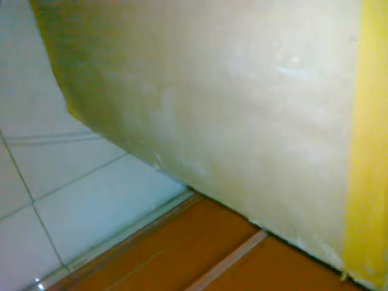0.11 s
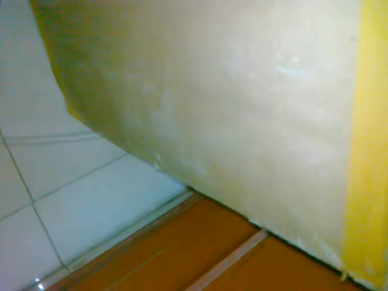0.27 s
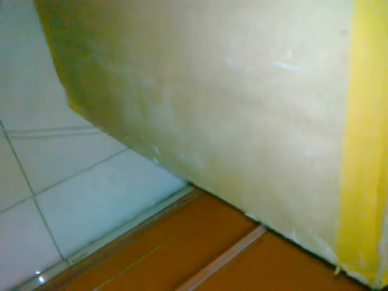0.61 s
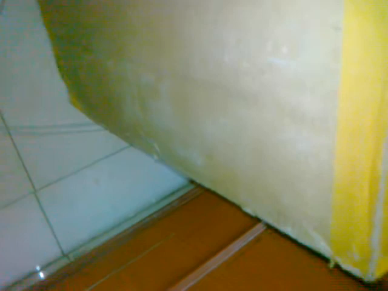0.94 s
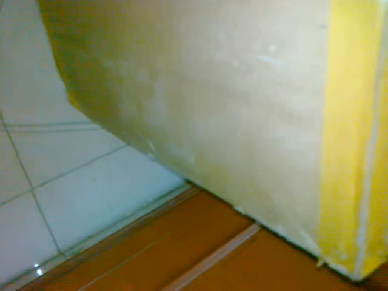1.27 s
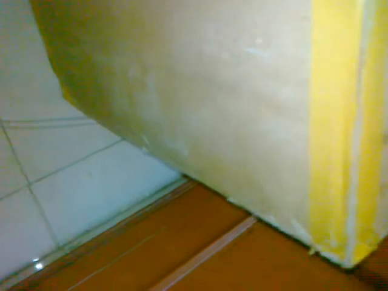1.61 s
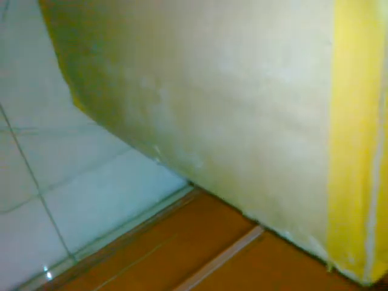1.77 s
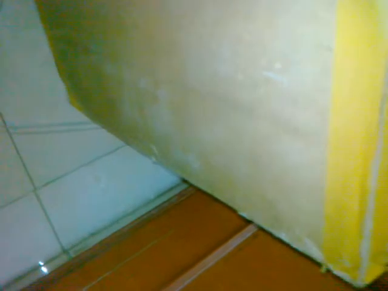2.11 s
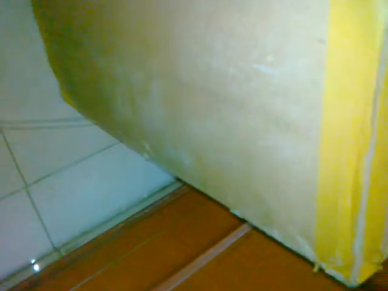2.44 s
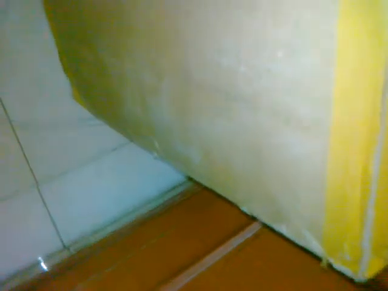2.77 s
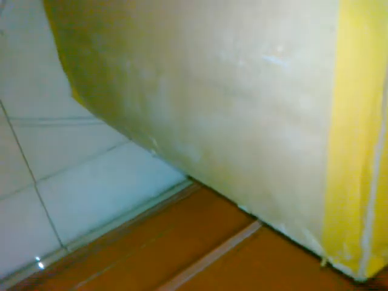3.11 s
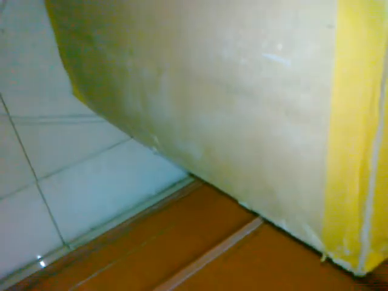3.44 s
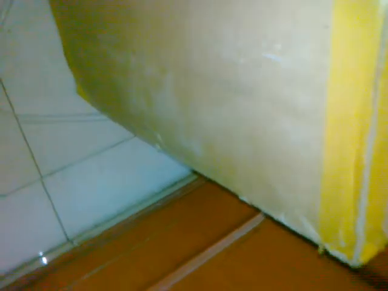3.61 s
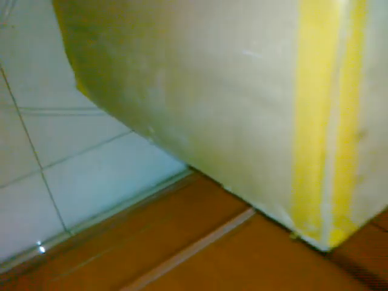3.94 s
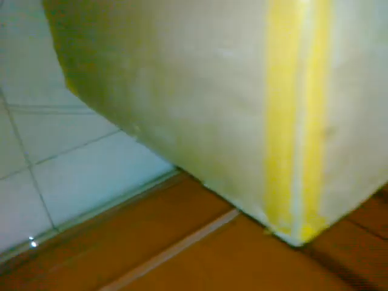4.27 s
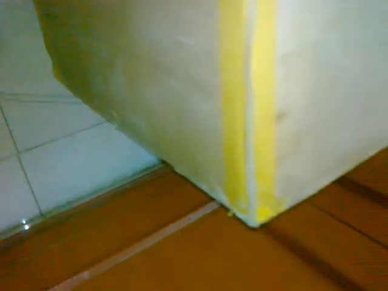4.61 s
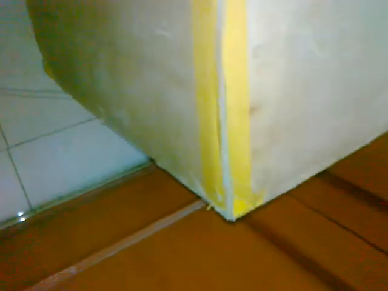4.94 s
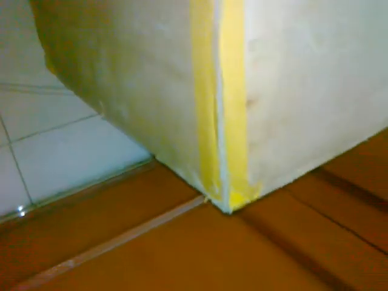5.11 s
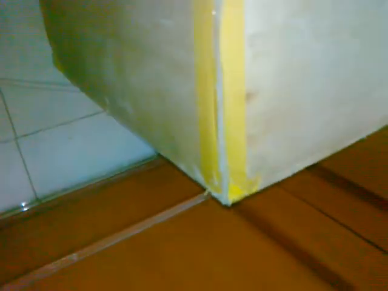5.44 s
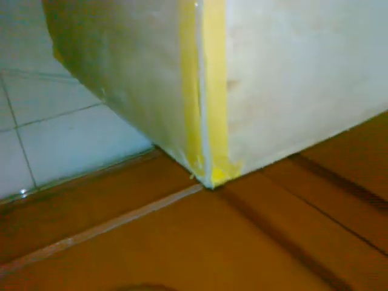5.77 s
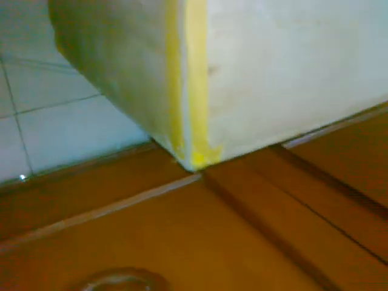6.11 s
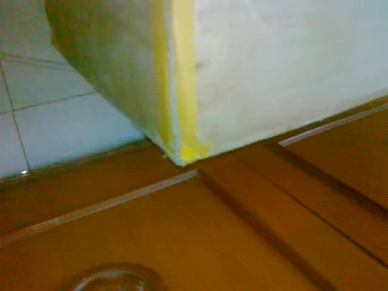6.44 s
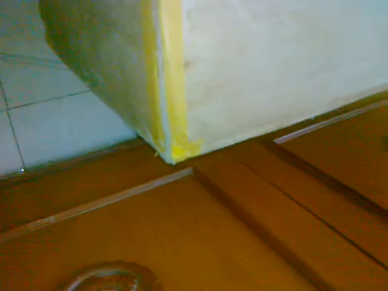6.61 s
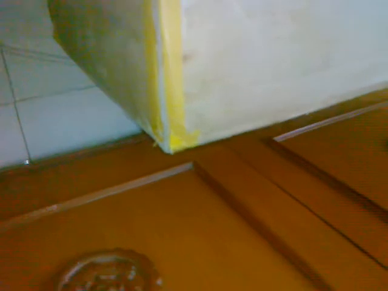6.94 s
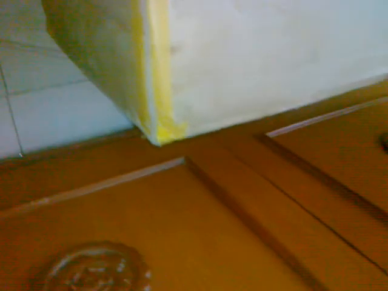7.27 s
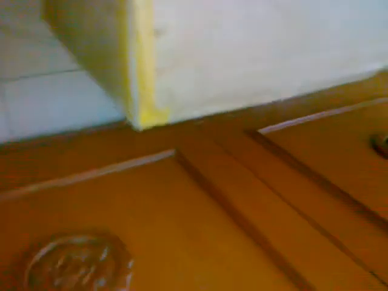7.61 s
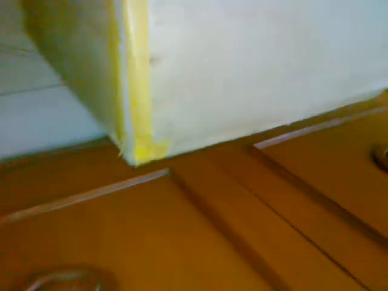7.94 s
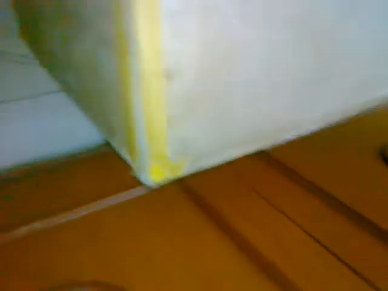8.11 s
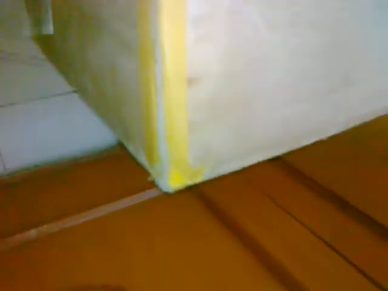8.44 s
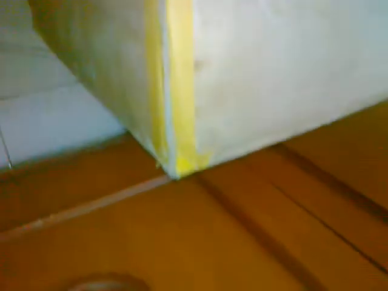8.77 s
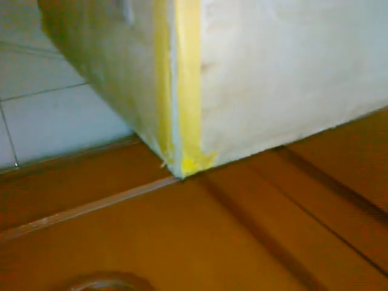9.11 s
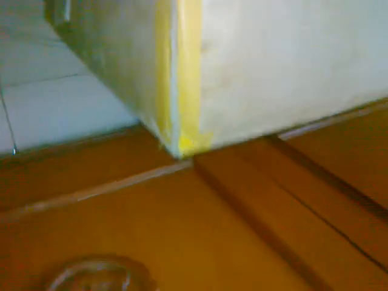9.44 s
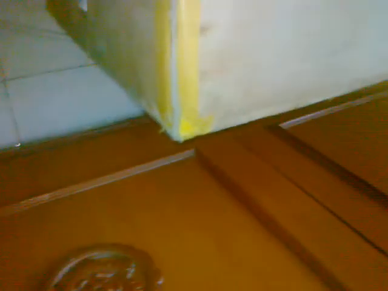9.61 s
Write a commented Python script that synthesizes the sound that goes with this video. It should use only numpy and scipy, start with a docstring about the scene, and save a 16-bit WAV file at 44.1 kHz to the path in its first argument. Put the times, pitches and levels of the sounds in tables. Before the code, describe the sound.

A big cardboard box rubs and scrapes against a wooden door, with hollow knocks and tape ticks over a faint hum.

```python
"""A small tiled room, where a big taped cardboard box is turned and slid against a wooden door.
Its edges rub and catch in tiny slips that drum the hollow walls, rasp in the board and hiss on the tape.
The box knocks and is set down, booming and slapping, and the tape ticks.
Under it lie a mains hum, a low room murmur and the narrow whine of a cheap microphone."""
import sys
import numpy as np
from scipy import signal
from scipy.fft import rfft, irfft, next_fast_len
from scipy.io import wavfile
from scipy.ndimage import map_coordinates

SR = 44100
rng = np.random.default_rng(int(sys.argv[2]) if len(sys.argv) > 2 else 0)


def master_out(mix):
    """Clip the mix to full scale and print it as 16-bit PCM to the path in sys.argv[1]."""
    frames = np.transpose(np.atleast_2d(mix))
    ceiling = np.clip(frames, -1, 1)
    pcm = np.round(ceiling * 32767).astype(np.int16)
    wavfile.write(sys.argv[1], SR, pcm)


N = 429093


# Pushes on the box. Each row: start, crest and end in seconds, drum level in dB, base drum centre in Hz.
PUSHES = [(1.27, 1.33, 1.46, -49, 164), (1.546, 1.638, 1.64, -45, 152), (3.388, 3.453, 3.5, -48.5, 150),
          (3.59, 3.785, 4.04, -43.5, 184), (4.05, 4.327, 4.84, -37.5, 180),
          (5.195, 5.694, 5.73, -36.5, 158), (5.79, 5.86, 5.96, -35.5, 125), (6.03, 6.23, 6.53, -43.5, 129),
          (6.67, 6.7, 7.2, -52, 150), (6.9, 7.1, 7.2, -60, 149), (7.906, 8.077, 8.15, -49.5, 226),
          (8.748, 8.915, 8.83, -43, 154), (9.006, 9.03, 9.4, -54, 170), (9.37, 9.389, 9.46, -48, 153)]
# Edges breaking free. Each row: start and length in seconds, rub and hiss in dB, rub's upper edge in Hz.
SCRAPES = [(0.29, 0.036, -66.5, -74, 1900), (1.237, 0.036, -57, -67, 1460), (1.305, .03, -60, -69, 1470),
           (1.39, .05, -57, -72, 1460), (1.477, 0.027, -60.5, -74, 1800),
           (1.567, 0.071, -54.5, -58.5, 1700), (3.389, 0.083, -46, -68, 1110), (3.63, 0.11, -47, -72, 1050),
           (3.791, .18, -47, -63, 1750), (4.063, .02, -55.5, -70, 1500), (4.11, .06, -51.5, -63.5, 1300),
           (4.277, 0.079, -56, -69, 1600), (4.402, 0.078, -47.5, -55, 2020),
           (4.485, 0.13, -49.5, -82, 1400), (5.176, 0.072, -53.5, -71, 1220),
           (5.28, 0.089, -50.5, -75, 1310), (5.49, 0.033, -48.5, -66, 1580),
           (5.547, 0.09, -44.5, -78, 1720), (5.66, 0.053, -40, -68, 1150), (5.757, 0.26, -47, -70, 730),
           (6.04, 0.14, -59, -67, 1500), (6.196, .05, -46, -61, 1270), (6.372, 0.043, -49.5, -59, 1800),
           (6.506, 0.032, -55.5, -79, 1450), (6.668, 0.12, -48.5, -62.5, 1530),
           (6.9, .06, -50, -59.5, 1760), (7.056, .04, -49, -61, 2000), (7.146, 0.046, -47.5, -58, 2200),
           (7.97, 0.036, -50, -69, 1720), (8.027, 0.069, -45, -68, 2030), (8.121, 0.033, -35.5, -47, 3300),
           (8.185, 0.17, -48.5, -57, 2410), (8.819, 0.11, -47, -57, 1533), (9.02, .05, -57.5, -58.5, 1400),
           (9.224, 0.019, -55, -70, 1830), (9.57, 0.21, -59.5, -64, 1830)]
def sliding():
    """Pushes drum the box and make it creep; scrapes rub and hiss. The strongest contact sets the pitch."""
    drum_power, centre_sum = 0, 0
    for start, crest, end, db, centre_hz in PUSHES:
        power = amp(db + hump_db(start, crest, end, attack=258, swell=20, sag=13.5, release=191)) ** 2
        drum_power += power
        centre_sum += power * centre_hz
    creep_rub_db, creep_hiss_db, creep_hz = -15, -30.5, 860
    rub_power = drum_power * amp(creep_rub_db) ** 2
    hiss_power = drum_power * amp(creep_hiss_db) ** 2
    edge_sum = rub_power * creep_hz
    for start, length, rub_db, hiss_db, upper_hz in SCRAPES:
        power = amp(hump_db(start, start, start + length, attack=450, swell=0, sag=61, release=222)) ** 2
        rub_power += power * amp(rub_db) ** 2
        hiss_power += power * amp(hiss_db) ** 2
        edge_sum += power * amp(rub_db) ** 2 * upper_hz
    edge_hz = edge_sum / rub_power
    drum_hz = centre_sum / drum_power * (edge_hz / 1330) ** 0.46  # faster slides shake higher modes
    grip_db = 1.87 * wobble(40)  # the edge catches and lets go
    drum = wall_drumming(drum_hz) * np.sqrt(drum_power) * amp(0.68 * grip_db)
    rub = edge_rub(edge_hz) * np.sqrt(rub_power) * amp(grip_db)
    hiss = tape_hiss() * np.sqrt(hiss_power) * amp(grip_db)
    return drum + rub + hiss


# Modes of the hollow walls. Each row: frequency in Hz, relative level in dB, free t60 in seconds.
WALL_MODES = [(57.5, -7.5, 0.55), (79, -14.5, 0.074), (115.2, -2.5, 0.69), (150.9, -3, 0.24),
              (162, 1.5, 0.14), (195.5, 3, 0.094), (237, -1.5, 0.12), (276, 0, 0.11), (332, -17.5, 0.47),
              (377.4, -4.5, 0.19), (466.3, -2.5, 0.14), (523.6, -8.5, 0.25)]
def wall_drumming(centre_hz):
    """Slips drum the hollow walls, which the hands damp."""
    t = np.arange(SR // 2) / SR
    held_walls = ring(WALL_MODES, t) * amp(-60 * t / 0.73)
    drum = signal.fftconvolve(slips(per_s=2000), held_walls)[:N]
    return swept(drum, centre_hz, below=2.45, above=1.72, frame=2048)


# Modes of the stiff board at a contact. Each row: frequency in Hz, relative level in dB, t60 in seconds.
BOARD_MODES = [(412, -16, 0.048), (614, -3, 0.029), (744, 2, 0.03), (859, 4, 0.018), (977.5, 1.5, 0.034),
               (1061, 1.5, 0.027), (1213, 5.5, 0.0084), (1446, -9, 0.045), (1561, -8.5, 0.068),
               (1734, -2.5, 0.024), (2260, 0.5, 0.0079), (3080, -5.5, 0.013)]
# Friction spectrum. Each row: frequency in Hz, relative level in dB.
RUB_SPECTRUM = [(150, -25), (300, 3), (550, 8.5), (750, 2), (980, -4), (1300, -1.5), (1600, -0.5),
                (2100, -4), (3000, -4), (4500, -9.5), (9000, -28)]
def edge_rub(edge_hz):
    """Slips rasp in the board; a fast slide skims, loses its lows and squeals."""
    t = np.arange(SR // 2) / SR
    jerks = slips(per_s=6000)
    catches = unit(slips(per_s=2500)) + 0.66 * unit(slips(per_s=90))  # a few fibres snag harder
    board = unit(signal.fftconvolve(catches, ring(BOARD_MODES, t))[:N])
    rasp = coloured(jerks, RUB_SPECTRUM) + 0.74 * board
    rub = swept(rasp, edge_hz, below=0.083, above=2.7, frame=512, low_hz=0.26 * edge_hz)
    squeal_hz, squeal_t60_s = 1523, 0.18
    squeal = unit(signal.fftconvolve(jerks, ring([(squeal_hz, 0, squeal_t60_s)], t))[:N])
    squeal_gain = amp(-3.5) * band(edge_hz, corner_hz=3000, below=3.8, above=0)
    return rub + squeal_gain * squeal


# Spectrum of sliding tape. Each row: frequency in Hz, relative level in dB.
HISS_SPECTRUM = [(1200, -38), (2400, 8), (3300, -3.5), (4200, -5), (5100, -6.5), (6500, -9.5), (9000, -14),
                 (15000, -25)]
def tape_hiss():
    """Fine slips hiss along the tape, and dust grains crackle under the edge."""
    grit = coloured(slips(per_s=460), SNAP_SPECTRUM)
    return coloured(slips(per_s=6000) + slips(per_s=4700), HISS_SPECTRUM) + 0.21 * grit


# Blows on the box. Each row: time in seconds, boom in dB, boom centre in Hz, slap in dB,
# slap's upper edge in Hz, crack in dB, skid time constant in seconds.
KNOCKS = [(1.381, -41.5, 171, -55, 1800, -65, .0004), (1.679, -39.5, 170, -52.5, 2400, -63, 0.0013),
          (2.3415, -42.5, 318, -36, 1700, -53, .0002), (3.372, -42.5, 300, -44.5, 1090, -71, 0.00041),
          (3.4193, -68, 400, -39.5, 1490, -55, .0007), (3.4664, -52, 400, -43.5, 1500, -57, 0.00066),
          (3.488, -54, 400, -46, 2000, -59, .0005), (3.713, -41, 240, -43.5, 1600, -60, .0007),
          (3.774, -39, 229, -56, 1000, -70, 0.0018), (3.801, -47, 220, -42.5, 2400, -47.5, 0.0013),
          (4.258, -46, 200, -57, 1600, -68, 0.0013), (4.321, -35.5, 169, -58, 1300, -74, 0.0013),
          (5.665, -41, 192, -57, 900, -61, .0015), (5.887, -53, 130, -45.5, 2400, -70, .0006),
          (6.233, -39.5, 180, -45.5, 2400, -56, 0.0013), (6.3677, -38.5, 195, -46, 2400, -48, 0.00064),
          (7.049, -46, 180, -45.5, 2400, -61, 0.0011), (7.1565, -62, 300, -42.5, 2400, -46, 0.00057),
          (7.458, -35.5, 444, -22.5, 2600, -36.5, 0.0036), (8.2664, -22.5, 232, -23, 2410, -46.5, 0.0017),
          (8.463, -38.5, 250, -41.5, 2200, -63, 0.00049), (8.528, -26.5, 129, -34, 1500, -74, 0.00043),
          (8.5633, -22, 95, -36.5, 1600, -63, .0005), (8.5735, -29.5, 160, -34, 2400, -56, 0.0014),
          (8.607, -29, 120, -47, 1600, -64, 0.0017), (8.8197, -33.5, 254, -38, 2400, -65, 0.0033),
          (8.917, -36, 262, -42, 1600, -66, 0.00062), (9.552, -44, 170, -48.5, 2240, -69, 0.0012),
          (9.596, -55, 299, -52.5, 2200, -64, 0.00048)]
# Spectra of crumpling flutes and of a corner's crack. Each row: frequency in Hz, relative level in dB.
CRUSH_SPECTRUM = [(200, -16), (400, -6.5), (750, -6.5), (1000, 0.5), (1600, -7.5), (2100, -5.5),
                  (3000, -13), (4500, -31), (9000, -40)]
CRACK_SPECTRUM = [(900, -34), (2500, 8), (3200, 5.5), (4200, -1), (5100, 3), (6500, -6.5), (10000, -14),
                  (15000, -27)]
def knocks():
    """A corner skids and bites: it sets the walls booming, slaps the board and cracks."""
    out, t = np.zeros(N), np.arange(SR * 3 // 5) / SR
    for time_s, boom_db, boom_hz, slap_db, slap_hz, crack_db, skid_s in KNOCKS:
        from_bite_s = t - 6 * skid_s
        swell = np.exp(np.minimum(from_bite_s, 0) / skid_s - (np.maximum(from_bite_s, 0) / 0.0032) ** 2)
        scuff = amp(slap_db) * coloured(rng.standard_normal(len(t)), CRUSH_SPECTRUM) * swell
        start = round((time_s + from_bite_s[0]) * SR)
        out[start:start + len(t)] += scuff[:N - start]
        add(out, time_s, room(wall_boom(boom_hz, t), wet_db=-4), boom_db)
        add(out, time_s, room(board_slap(slap_hz, t), wet_db=-7), slap_db)
        onset = 1 - np.exp(-t / (1.2 * skid_s))  # a glancing blow cracks more softly
        crack = burst(CRACK_SPECTRUM, t, t60_s=0.027) * onset
        add(out, time_s, room(crack, wet_db=-6.5), crack_db)
    return out


def wall_boom(centre_hz, t):
    """A blow starts all wall modes in step; where it lands decides which answer most."""
    modes = weighted(varied(WALL_MODES), centre_hz, below=1.9, above=0.88)
    boom = sum(ring([mode], t) for mode in modes)
    leak_hz = 68  # below this the walls only push air aside
    return signal.lfilter(*signal.butter(2, leak_hz, 'high', fs=SR), boom)


def board_slap(edge_hz, t):
    """The flutes crumple and the board rings; a blunt contact is duller."""
    crush = burst(weighted(CRUSH_SPECTRUM, edge_hz, below=0, above=1.5), t, t60_s=0.046)
    board = ring(weighted(varied(BOARD_MODES), edge_hz, below=0, above=4.1), t)
    onset = 1 - np.exp(-(t / 0.0004) ** 2)
    return (board + 0.86 * crush) * onset


# Snaps of tape and torn edges. Each row: start in seconds, crack in dB, board click in dB.
TICKS = [(0.3, -74, -70), (0.6, -66.5, -82), (1.237, -63, -57.5), (1.875, -59.5, -80), (2.17, -62, -82),
         (2.493, -65, -83), (3.136, -64.5, -83), (3.582, -75, -59), (3.683, -55, -73), (3.793, -51.5, -67),
         (4.389, -52, -61), (4.636, -63.5, -64), (5.05, -64, -74), (6.7674, -54.5, -48.5),
         (6.823, -54.5, -55), (7.102, -60, -54), (7.136, -53.5, -62), (7.383, -51, -49), (7.4604, -33, -57),
         (7.616, -63.5, -70), (8.1169, -49, -38.5), (9.064, -64.5, -55.5), (9.539, -62, -84),
         (9.648, -53.5, -53)]
# Spectrum of a snap. Each row: frequency in Hz, relative level in dB.
SNAP_SPECTRUM = [(1200, -10), (2800, 4), (4200, -6), (5200, -3), (6500, -7), (8000, -9), (12000, -15.5),
                 (15000, -18)]
def tape_ticks():
    """Tape snaps with a bright crack and a small click of the board."""
    out, t = np.zeros(N), np.arange(SR // 3) / SR
    peel = 1 - np.exp(-t / 0.001)
    for start_s, crack_db, click_db in TICKS:
        add(out, start_s, room(burst(SNAP_SPECTRUM, t, t60_s=0.019) * peel, wet_db=-4.5), crack_db)
        add(out, start_s, room(ring(varied(BOARD_MODES), t) * peel, wet_db=0), click_db)
    return out


# Decay of the tiled room. Each row: frequency in Hz, t60 in seconds.
ROOM_DECAY = [(100, 0.27), (500, .38), (1500, 0.41), (5000, 0.32), (14000, 0.36)]
def room(x, wet_db):
    """Hard walls and tiles add a tail, different for each spot on the box."""
    hz, t, noise = signal.stft(rng.standard_normal(SR // 2), SR, nperseg=256)
    decay = amp(-60 * t / along(ROOM_DECAY, hz)[:, None])
    tail = signal.istft(noise * decay, SR, nperseg=256)[1]
    tail = np.pad(tail / np.linalg.norm(tail), (round(0.0054 * SR), 0))
    return x + amp(wet_db) * signal.fftconvolve(x, tail)[:len(x)]


# Hum tones. Each row: frequency in Hz, median rms level in dB.
HUM_TONES = [(49.7, -55.5), (100, -59.5), (188, -63.5), (436, -71.5), (530, -66), (630, -72.5),
             (4443, -79.5), (5100, -85), (8000, -89)]
def mains_hum():
    """Mains hum and faint high tones, each wavering in level and phase."""
    out, t = np.zeros(N), np.arange(N) / SR
    for hz, db in HUM_TONES:
        peak = np.sqrt(2) * amp(db + 2.2 * wobble(5.7))
        out += peak * np.sin(2 * np.pi * hz * t + 0.56 * wobble(6))
    return out


# Murmur spectrum. Each row: frequency in Hz, relative level in dB.
MURMUR_SPECTRUM = [(25, -16), (50, -4), (80, 0), (120, 2), (170, -11.5), (230, -12), (420, -14), (560, -13),
                   (800, -26), (1300, -30), (2100, -24), (3600, -30), (8000, -36.5), (15500, -40)]
def room_murmur():
    """The room's steady low noise."""
    return amp(-54.5) * coloured(rng.standard_normal(N), MURMUR_SPECTRUM)


# Whine bands. Each row: centre in Hz, half-width in Hz, rms level in dB.
WHINE_BANDS = [(2491.5, 34, -63.5), (2590, 35.5, -64.5), (3025, 38, -80), (4380, 180, -78.5)]
def microphone_whine():
    """A cheap microphone whines in narrow bands of noise."""
    out = np.zeros(N)
    for centre_hz, half_width_hz, db in WHINE_BANDS:
        resonance = lambda hz: 1 / np.hypot(1, ((hz - centre_hz) / half_width_hz) ** 2)
        out += amp(db) * unit(filtered(rng.standard_normal(N), resonance))
    return out


def slips(per_s):
    """Stick-slip friction: a random train of tiny, uneven jerks."""
    return (rng.random(N) < per_s / SR) * rng.standard_normal(N)


def ring(modes, t):
    """Damped panel modes; neighbours swing in opposite directions."""
    return sum((-1) ** k * amp(db - 60 * t / t60_s) * np.sin(2 * np.pi * hz * t)
               for k, (hz, db, t60_s) in enumerate(modes))


def varied(modes):
    """Each blow lands on a new spot and gives the modes new strengths."""
    return [(hz, db + rng.standard_normal(), t60_s) for hz, db, t60_s in modes]


def burst(spectrum, t, t60_s):
    """A dying puff of coloured noise."""
    return coloured(rng.standard_normal(len(t)), spectrum) * amp(-60 * t / t60_s)


def hump_db(start, crest, end, attack, swell, sag, release):
    """A rise to 0 dB at the crest, then a fall; times in seconds, slopes in dB/s."""
    start_db, end_db = -swell * (crest - start), -sag * (end - crest)
    return np.interp(np.arange(N) / SR, [start - 1, start, crest, end, end + 1],
                     [start_db - attack, start_db, 0, end_db, end_db - release])


def wobble(knots_per_s):
    """A smooth random curve."""
    knots = rng.standard_normal(int(N * knots_per_s / SR) + 4)
    return map_coordinates(knots, [np.arange(N) * knots_per_s / SR])


def add(track, start_s, sound, db):
    """Mix in a hit, with db as the rms of its first 10 ms."""
    start = round(start_s * SR)
    head_rms = np.sqrt(np.mean(sound[:SR // 100] ** 2))
    track[start:start + len(sound)] += (amp(db) * sound / head_rms)[:N - start]


def band(hz, corner_hz, below, above):
    """A gain falling as the given powers of frequency below and above the corner."""
    ratio = (hz + 1) / corner_hz
    return ratio ** below / np.hypot(1, ratio ** (below + above))


def weighted(rows, corner_hz, below, above):
    """(Hz, dB, ..) rows with their levels shaped by a band."""
    return [(hz, db + 20 * np.log10(band(hz, corner_hz, below, above)), *rest) for hz, db, *rest in rows]


def swept(x, corner_hz, below, above, frame, low_hz=1):
    """x through a moving band, cut under low_hz, at an even rms of 1."""
    hz, frame_s, spectra = signal.stft(x, SR, nperseg=frame)
    framed = lambda curve: np.interp(frame_s, np.arange(N) / SR, curve * np.ones(N))
    gain = band(hz[:, None], framed(corner_hz), below, above)
    gain *= band(hz[:, None], framed(low_hz), below=5.8, above=0)
    power = np.mean(np.abs(spectra) ** 2, axis=1, keepdims=True)
    gain /= np.sqrt(np.sum(power * gain ** 2, axis=0))
    return unit(signal.istft(spectra * gain, SR, nperseg=frame)[1][:N])


def coloured(x, spectrum):
    """x shaped by a spectrum, at rms 1."""
    return unit(filtered(x, lambda hz: amp(along(spectrum, hz))))


def filtered(x, response):
    """x through a frequency response."""
    size = next_fast_len(len(x) + 8192)
    return irfft(rfft(x, size) * response(np.fft.rfftfreq(size, 1 / SR)), size)[:len(x)]


def along(points, hz):
    """(Hz, value) points joined on a log axis."""
    point_hz, values = np.transpose(points)
    return np.interp(np.log(hz + 1), np.log(point_hz), values)


def amp(db):
    """Decibels to gain."""
    return 10 ** (np.asarray(db) / 20)


def unit(x):
    """Scale to rms 1."""
    return x / np.sqrt(np.mean(x ** 2) + 1e-20)


def scene():
    """The box in its room over the steady background, in mono."""
    box = knocks() + tape_ticks() + room(sliding(), wet_db=-15.5)
    return (box + room_murmur() + mains_hum() + microphone_whine())[None]


def record(dry):
    """Cut everything above the band limit."""
    top_hz = 15770
    return np.array([filtered(channel, lambda hz: hz < top_hz) for channel in dry])


dry = scene()
out = record(dry)
master_out(out)
```